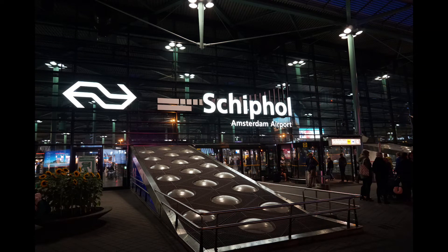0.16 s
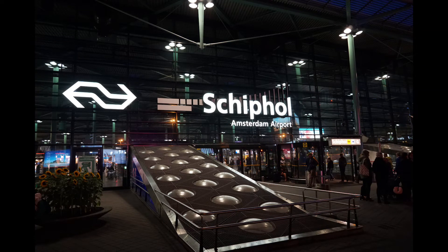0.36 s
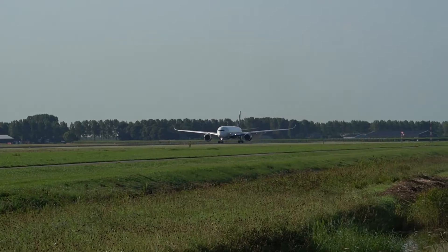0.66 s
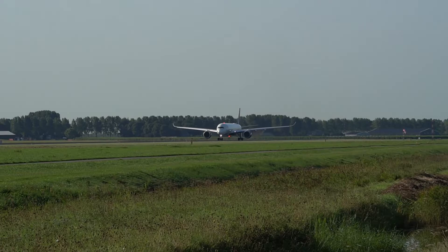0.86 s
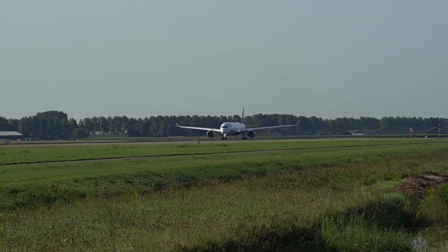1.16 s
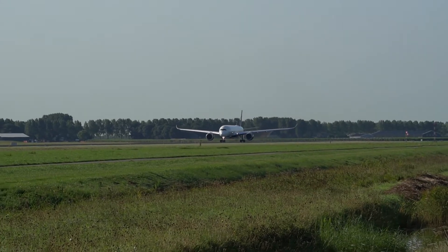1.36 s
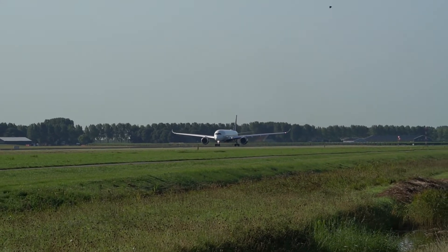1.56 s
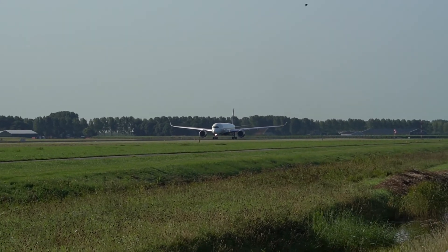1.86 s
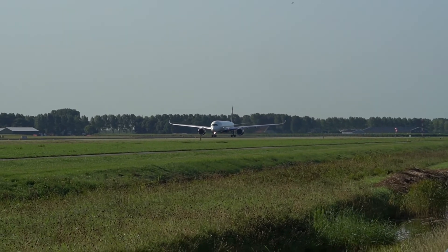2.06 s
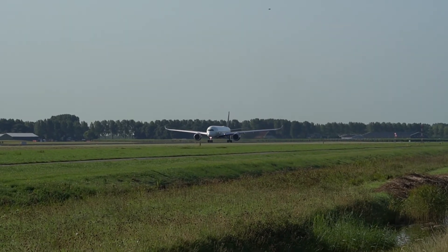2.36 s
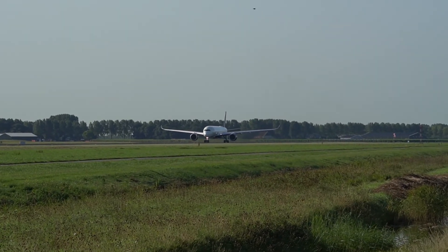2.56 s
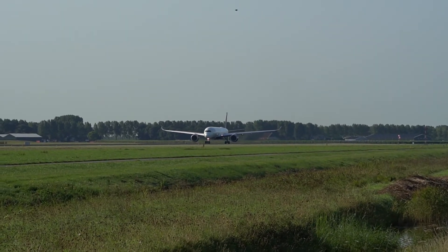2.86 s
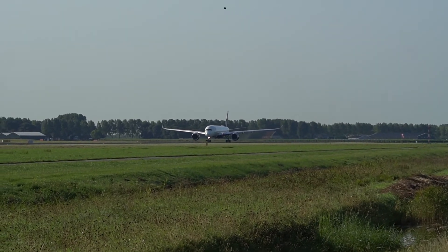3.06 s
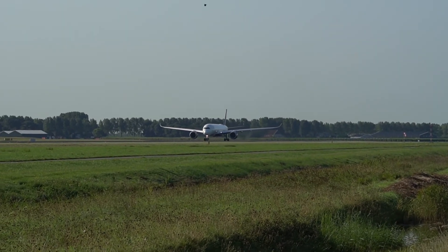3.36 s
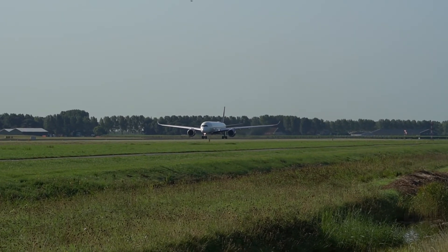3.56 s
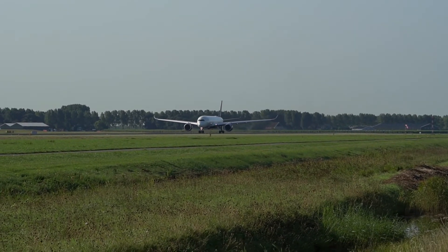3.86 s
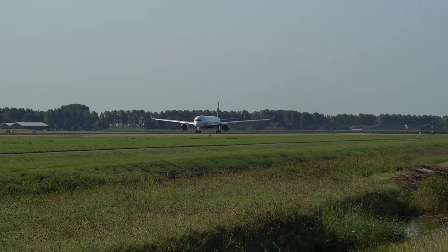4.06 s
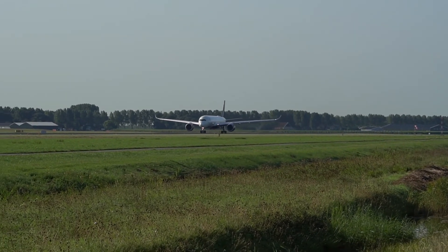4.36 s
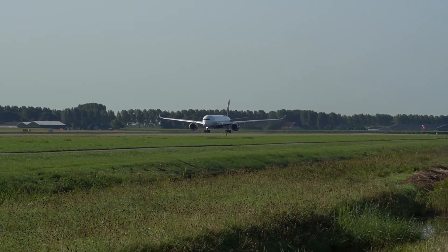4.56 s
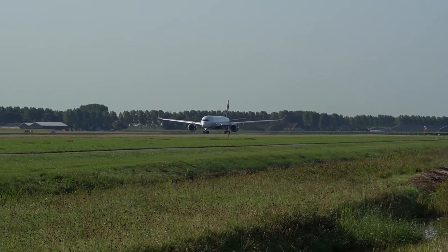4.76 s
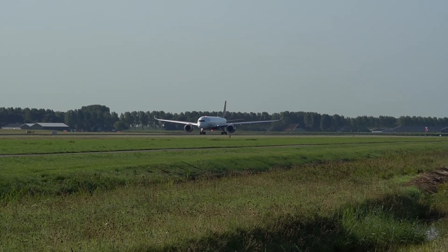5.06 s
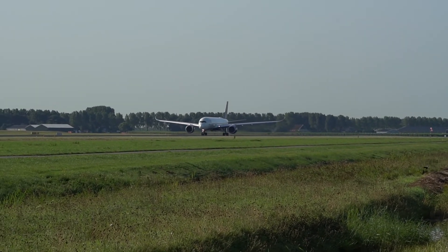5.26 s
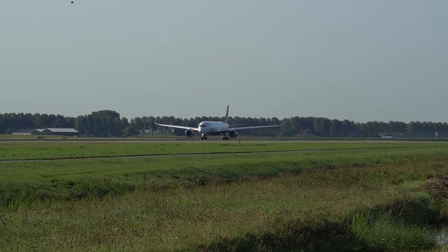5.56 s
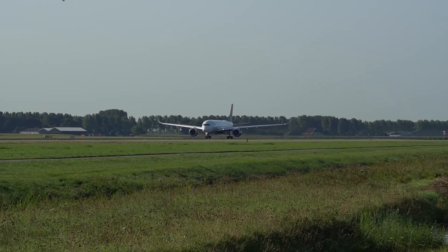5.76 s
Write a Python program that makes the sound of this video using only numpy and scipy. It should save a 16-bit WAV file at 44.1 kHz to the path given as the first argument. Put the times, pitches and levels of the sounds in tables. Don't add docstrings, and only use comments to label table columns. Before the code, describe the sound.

Complete silence lasts until about 0.6 seconds, then the sound of a distant twin-engine airliner fades in almost at once. A deep, uneven rumble surges several times a second under a low growl and a broad, air-dulled jet roar. At 0.94 seconds there is one sharp snap; at 1.84 a short, low wind knock. Low wind buffeting is strongest around 1.8 to 2.5 seconds. Faint narrow drones of far traffic swell mostly before 4 seconds. Through the roar runs a fluttering fan whine near 900 hertz, with a fainter octave and a buzzy comb of shaft tones; it creeps up slightly in pitch and grows clearer, strongest around 5 seconds. Tiny ticks and a rustle come near 3.2 seconds, with fainter ticks later. A wavering low hum joins near 5 seconds. Quiet microphone hiss sinks slightly. The roar continues until it stops abruptly around 5.9 seconds.

```python
import sys
import numpy as np
from scipy import signal
from scipy.fft import rfft, irfft, next_fast_len
from scipy.io import wavfile
from scipy.ndimage import uniform_filter1d

SR = 44100
rng = np.random.default_rng(int(sys.argv[2]) if len(sys.argv) > 2 else 0)


def to_wav(s):
    ch = np.atleast_2d(s).T
    pcm = np.round(np.clip(ch, -1, 1) * 32767)
    wavfile.write(sys.argv[1], SR, pcm.astype(np.int16))


def natural_amplitude(level_db):
    exponent = np.asarray(level_db, float) / 20
    return 10 ** exponent


N = 260336
T = np.arange(N) / SR


def unit(x):
    return x / np.sqrt(np.mean(x ** 2) + 1e-20)


def along(points, hz):
    f, v = np.transpose(points)
    return np.interp(np.log(hz + 1), np.log(f + 1), v)


def curve(rows):
    s, value = np.transpose(rows)
    return np.interp(T, s, value)


def bell(t, s, spread):
    return np.exp(-((t - s) / spread) ** 2)


def swells(rows, rest_db, t):
    power = natural_amplitude(2 * rest_db) + sum(natural_amplitude(2 * db) * bell(t, s, spread) for s, spread, db in rows)
    return 10 * np.log10(power)


def wobble(rate, t):
    knots = uniform_filter1d(rng.standard_normal(256), size=2) * np.sqrt(2)
    return np.interp(t * rate, np.arange(256), knots)


def filtered(x, response):
    m = next_fast_len(N + 8192)
    return irfft(rfft(x, m) * response(np.fft.rfftfreq(m, 1 / SR)), m)[:N]


def eddy_noise(spectrum, patchy_db):
    z = signal.stft(rng.standard_normal(N), nperseg=1024)[2]
    patches = uniform_filter1d(rng.standard_normal(z.shape), size=8, axis=0)
    patches = uniform_filter1d(patches, size=24, axis=1)
    x = signal.istft(z * natural_amplitude(patchy_db * unit(patches)), nperseg=1024)[1][:N]
    return unit(filtered(x, lambda hz: natural_amplitude(along(spectrum, hz))))


def even_noise(spectrum, span_s):
    x = eddy_noise(spectrum, patchy_db=0.5)
    width = int(span_s * SR)
    power = np.abs(uniform_filter1d(uniform_filter1d(x ** 2, width), width))
    return unit(x / np.sqrt(power + 0.11))


# peak in seconds, spread in seconds, level in dB.
SURGES = [(0.85, 0.19, -14), (1.11, 0.05, -12), (1.29, 0.05, -10), (1.47, 0.24, -15), (1.75, 0.093, -13),
          (1.98, 0.051, -11.5), (2.17, 0.12, -15.5), (2.38, 0.059, -14.5), (2.53, 0.05, -14.5),
          (2.8, 0.086, -11.5), (3.01, 0.024, -20), (3.08, 0.144, -11.5), (3.41, 0.08, -12.5),
          (3.6, 0.072, -13), (3.8, 0.074, -12), (3.97, 0.044, -17), (4.16, 0.1, -16), (4.38, 0.071, -15.5),
          (4.58, 0.14, -14), (4.81, 0.057, -12), (5.0, 0.113, -15.5), (5.33, 0.11, -11.5),
          (5.62, 0.023, -13), (5.79, 0.076, -15)]


def rumble_level():
    return swells(SURGES, -23.5, T)


# frequency in Hz, level in dB per Hz.
RUMBLE = [(28, -33), (44, -3), (50, 1), (57, 2.5), (66, .5), (76, -5), (90, -8), (102, -16), (120, -30),
          (240, -120)]


def rumble():
    return natural_amplitude(rumble_level()) * even_noise(RUMBLE, span_s=0.087)


# frequency in Hz, level in dB per Hz.
GROWL = [(59, -35), (95, -6.5), (110, -1.5), (125, -1), (150, -2.5), (185, -8.5), (221, -8.5), (269, -16.5),
         (340, -20), (440, -42), (750, -120)]
# middle in seconds, spread in seconds, depth in dB.
LULLS = [
    (.74, 0.26, 7),
    (1.55, .12, 2.5),
    (3.18, .08, 1.5),
    (3.5, 0.22, 4.5),
    (4.0, .08, 2),
    (4.9, .3, 0.5),
]


def growl():
    rumble_db = rumble_level()
    level_db = -24 + 1.5 * wobble(14, T)
    level_db -= sum(depth * bell(T, s, spread) for s, spread, depth in LULLS)
    level_db += 0.19 * (rumble_db - rumble_db.mean())
    level_db -= 0.2 * (T - T.mean())
    return natural_amplitude(level_db) * even_noise(GROWL, span_s=0.14)


# frequency in Hz, level in dB per Hz.
ROAR = [
    [(180, -36), (310, -6), (465, -8), (584, -5.5), (810, -5), (927, -0.5), (998, -3), (1350, -13),
     (1760, -38), (2970, -120)],
    [(180, -41), (310, -11), (424, -12.5), (835, -4.5), (945, -2.5), (1020, -5.5), (1140, -6),
     (1350, -22.5), (1760, -48.5), (2970, -120)],
]
# frequency in Hz, level in dB per Hz.
RUSH = [
    [(740, -37), (1250, -7), (1610, -4), (1900, -4), (1940, -4.5), (2570, -13.5), (3300, -18.5),
     (4320, -37), (5200, -47.5), (6760, -75), (11400, -120)],
    [(740, -29.5), (1250, -5), (1370, -9.5), (1500, -2), (1940, -4), (2000, -7.5), (2950, -12.5),
     (3700, -21), (5200, -53.5), (6760, -85), (11400, -120)],
]
# time in seconds, level in dB.
CARRY = [(.64, -0.5), (1.25, -0.1), (1.42, -2.5), (2.25, -2.5), (2.7, -0.2), (3.2, -2), (3.65, .4),
         (4.1, 0.5), (4.55, -1), (5.1, 1.1), (5.9, 0.6)]


def jet():
    carry_db = curve(CARRY)
    roar_db = -27 + carry_db + 2.5
    rush_db = -33 + 0.9 * carry_db - 1.62
    near = np.clip((T - 1.8) / 3.33, 0, 1) * np.pi / 2
    far_part, near_part = np.cos(near), np.sin(near)
    roar = far_part * eddy_noise(ROAR[0], patchy_db=0.1)
    roar += near_part * eddy_noise(ROAR[1], patchy_db=-0.1)
    rush = far_part * eddy_noise(RUSH[0], patchy_db=1.0)
    rush += near_part * eddy_noise(RUSH[1], patchy_db=1.5)
    return natural_amplitude(roar_db) * roar + natural_amplitude(rush_db) * rush


COARSE = 4
FAN_T = T[::COARSE]


def full_rate(tones):
    return np.sqrt(2) * signal.resample_poly(tones, COARSE, 1)[:N]


def shimmer():
    return 0.45 * wobble(9, FAN_T)


# time in seconds, turns per second.
SHAFT = [(.6, 41.572), (5.9, 43.444)]


def fan_angle():
    return (2 * np.pi * np.cumsum(curve(SHAFT)) / SR)[::COARSE]


# peak in seconds, spread in seconds, level in dB.
BLADE_SWELLS = [(1.17, 0.06, -38), (1.85, 0.12, -30.5), (2.51, 0.2, -36.8), (2.8, 0.074, -31.9),
                (3.12, 0.102, -30), (3.39, 0.057, -32), (3.59, 0.058, -32), (3.91, 0.11, -29),
                (4.27, 0.12, -28), (4.52, 0.096, -28), (5.04, 0.21, -26), (5.61, 0.18, -27)]
# peak in seconds, spread in seconds, level in dB.
OCTAVE_SWELLS = [(1.05, 0.152, -43.5), (1.37, 0.097, -49), (2.11, 0.094, -41), (2.55, 0.093, -49),
                 (2.97, 0.068, -43.5), (3.38, 0.244, -44), (4.01, 0.24, -39.0), (4.45, 0.094, -44.5),
                 (4.87, 0.15, -45), (5.2, 0.081, -42), (5.43, 0.124, -39), (5.74, 0.1, -39.5)]


def blade_whine():
    blades = 22
    angle = fan_angle()
    blade_rest_db = -47 + 2 * FAN_T
    blade_db = swells(BLADE_SWELLS, blade_rest_db, FAN_T) + 3 + 1.8 * wobble(28, FAN_T)
    octave_db = swells(OCTAVE_SWELLS, -56, FAN_T) + 2 + 1.2 * wobble(28, FAN_T)
    tones = natural_amplitude(blade_db) * np.sin(blades * angle + shimmer())
    tones += natural_amplitude(octave_db) * np.sin(2 * blades * angle + shimmer())
    return full_rate(tones)


# multiple of the shaft speed, level in dB.
SAW = [(9, -46.3), (10, -44.0), (11, -46.6), (12, -47.4), (14, -45.9), (26, -39.7), (32, -52.8),
       (35, -55.2), (37, -54.5), (40, -51.7), (42, -53.1), (45, -56.4), (48, -55.5), (49, -55.7),
       (50, -56.7), (51, -60.1), (52, -59.3), (53, -59.0), (54, -60.0), (55, -58.2), (56, -58.1),
       (57, -61.3), (59, -63.6), (60, -64.4), (66, -59.8), (71, -66.9)]
# frequency in Hz, level in dB.
COMB = [(200, -52), (1000, -52), (1400, -58), (2000, -59), (3000, -70), (3800, -84)]


def shaft_tones():
    angle = fan_angle()
    nearing_db = np.interp(FAN_T, [0.6, 5.9], [-2.5, 1.5])
    strong = dict(SAW)
    final_speed = SHAFT[1][1]
    tones = np.zeros(len(FAN_T))
    for k in range(5, 90):
        level_db = strong.get(k, along(COMB, k * final_speed))
        depth_db = 2 if k == 26 else 3.8
        fading_db = depth_db * wobble(3, FAN_T) - 0.3
        phase = 2 * np.pi * rng.random() + shimmer()
        tones += natural_amplitude(level_db + nearing_db + fading_db) * np.sin(k * angle + phase)
    return full_rate(tones)


# frequency in Hz, level in dB per Hz.
BUFFET = [(7, -40), (12, -12), (22, -8), (30, -3), (38, -1), (46, -2), (57, -30), (97, -120)]
# peak in seconds, spread in seconds, level in dB.
GUSTS = [(0.78, 0.035, -24), (1.02, 0.076, -16), (1.19, 0.048, -15.5), (1.31, 0.074, -19.2),
         (1.54, 0.056, -18), (1.85, 0.13, -13), (2.13, 0.12, -11.5), (2.29, 0.034, -13.3),
         (2.47, 0.115, -14), (2.78, 0.139, -17), (3.06, 0.096, -15.5), (3.42, 0.13, -14.5),
         (3.78, 0.055, -19.5), (3.94, 0.053, -20.5), (4.19, 0.039, -22.5), (4.3, 0.039, -18),
         (4.41, 0.19, -17.5), (4.81, 0.06, -23.8), (4.95, 0.056, -23), (5.28, 0.033, -20.5),
         (5.43, 0.22, -22), (5.78, 0.19, -18)]
# time in seconds, length in seconds, frequency in Hz, level in dB.
THUMP = (1.836, .006, 130, -8)


def wind():
    buffeting = natural_amplitude(swells(GUSTS, -28.5, T)) * even_noise(BUFFET, span_s=0.031)
    s, length, hz, db = THUMP
    knock = natural_amplitude(db) * bell(T, s, length) * np.cos(2 * np.pi * hz * (T - s) + 1)
    return buffeting + knock


# frequency in Hz, level in dB per Hz.
HISS = [(2800, -27.5), (4800, 1), (6200, 0), (11000, -1.5), (15000, -2), (15740, -4), (15780, -90)]
# time in seconds, length in seconds, level in dB.
TICKS = [
    (3.162, .002, -63),
    (3.178, .018, -68.5),
    (3.179, .0008, -59),
    (3.19, .008, -69),
    (3.8, .004, -73),
    (4.1, .004, -70),
    (5.18, .004, -71),
]


def camera():
    hiss_db = np.interp(T, [0.6, 2.8, 3.5, 5.9], [-69.5, -70.5, -72.0, -72.0])
    hiss = natural_amplitude(hiss_db) * eddy_noise(HISS, patchy_db=0.3)
    rustle_colour = [(2500, -30), (4200, -5), (5200, -3), (5700, 3), (6300, -3), (9000, -4),
                     (11500, -14), (15000, -40)]
    bursts = sum(natural_amplitude(db) * bell(T, s, length) for s, length, db in TICKS)
    rustle = bursts * eddy_noise(rustle_colour, patchy_db=2)
    u = T - 0.94430
    rise = 0.38 * np.exp(-np.abs(u) / 0.00045)
    recovery = -0.2 * np.exp(-np.abs(u) / 0.0004)
    snap = np.where(u < 0, rise, recovery)
    top_hz, edge_hz = 16790, 300
    snap = filtered(snap, lambda hz: np.clip((top_hz - hz) / edge_hz + 0.5, 0, 1))
    return hiss + rustle + snap


# frequency in Hz, width in Hz, loudest at seconds, spread in seconds, level in dB.
DRONES = [
    (305.5, 2.5, 1.5, 1, -36),
    (373, 11, 1, 1.3, -37),
    (432.6, 3.7, 2.1, 0.23, -34),
    (607, 36, 3.3, 0.65, -36),
]


def drones():
    out = np.zeros(N)
    for hz, width, s, spread, db in DRONES:
        band = filtered(rng.standard_normal(N), lambda f: np.exp(-((f - hz) / width) ** 2))
        out += natural_amplitude(db) * bell(T, s, spread) * unit(band)
    return out


# frequency in Hz, loudest at seconds, spread in seconds, level in dB.
HUM = (136, 5.4, .5, -26.5)


def hum():
    hz, s, spread, db = HUM
    swell = natural_amplitude(db + 1.5 * wobble(8, T)) * np.exp(-((T - s) / spread) ** 4)
    return np.sqrt(2) * swell * np.sin(2 * np.pi * hz * T + 0.8 * wobble(7, T))


def scene():
    fade_in = np.clip((T - 0.617) * 45, 0, 1)
    fade_out = np.clip((N / SR - T) / 0.0003, 0, 1)
    plane = rumble() + growl() + jet() + blade_whine() + shaft_tones()
    mix = plane + wind() + camera() + drones() + hum()
    return (fade_in * fade_out * mix)[None]


def roll_off(x):
    return signal.sosfilt(signal.butter(12, 16790, fs=SR, output="sos"), x)


def record(dry):
    limited = dry / (1 + np.abs(dry / 0.95) ** 6) ** (1 / 6)
    return roll_off(limited)


dry = scene()
out = record(dry)
to_wav(out)
```